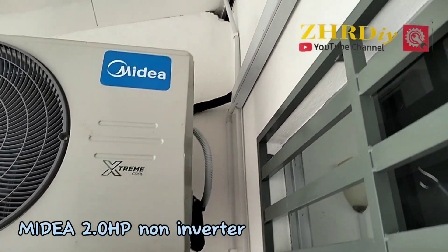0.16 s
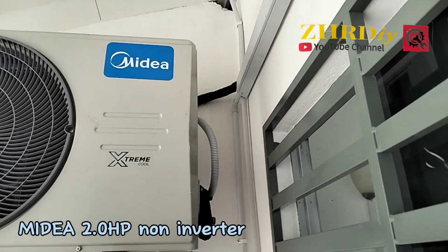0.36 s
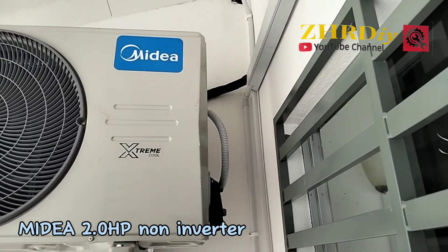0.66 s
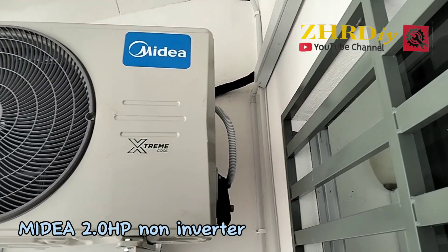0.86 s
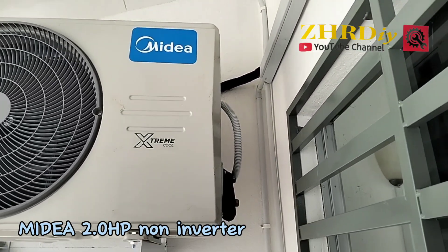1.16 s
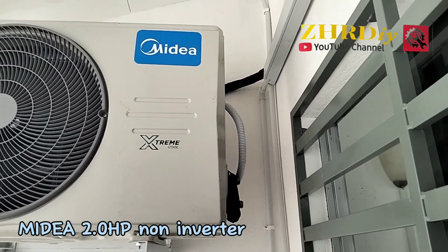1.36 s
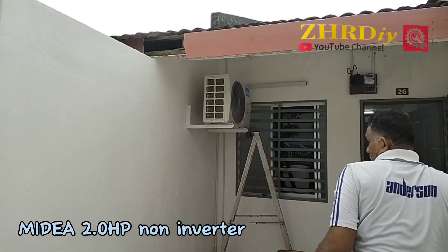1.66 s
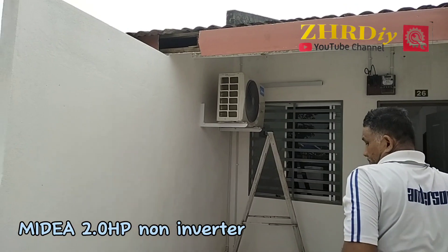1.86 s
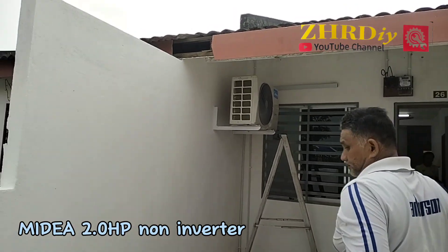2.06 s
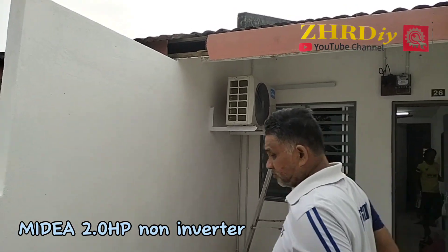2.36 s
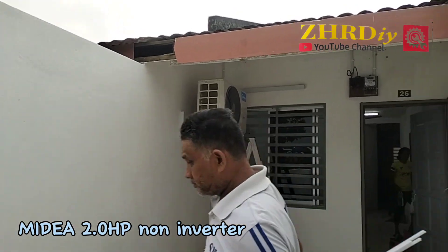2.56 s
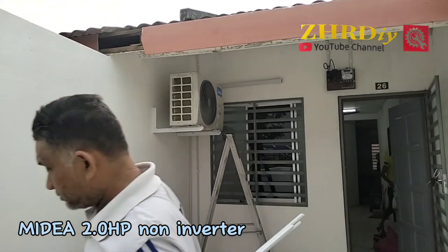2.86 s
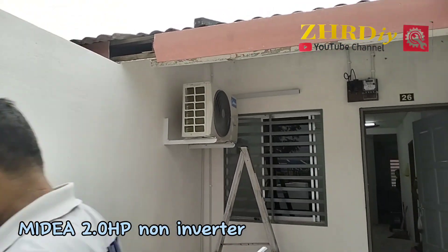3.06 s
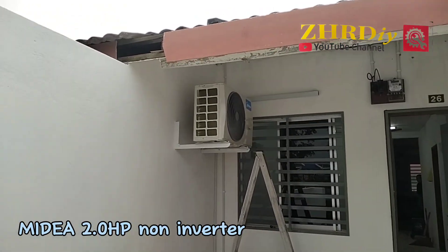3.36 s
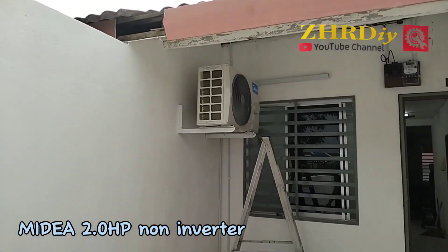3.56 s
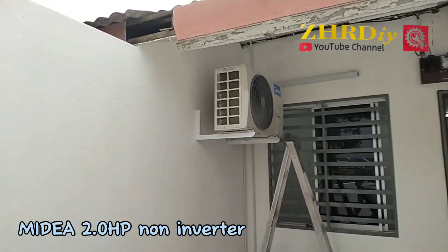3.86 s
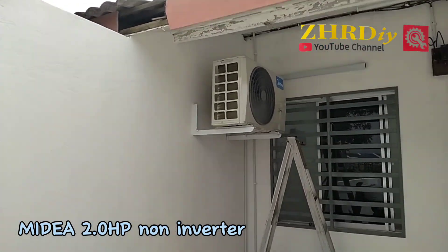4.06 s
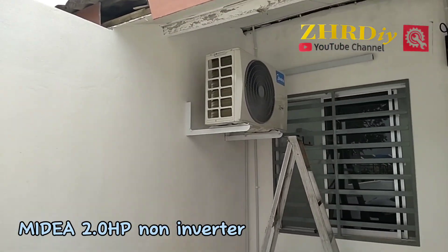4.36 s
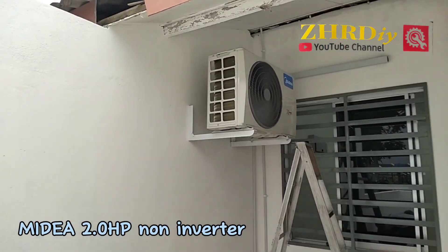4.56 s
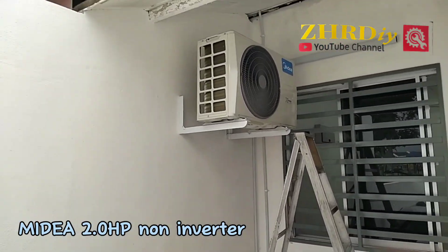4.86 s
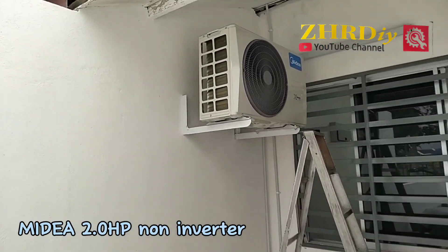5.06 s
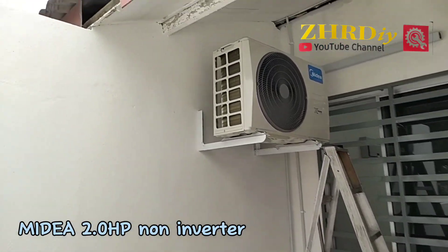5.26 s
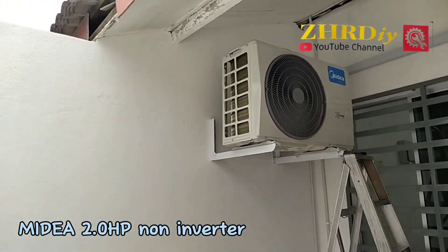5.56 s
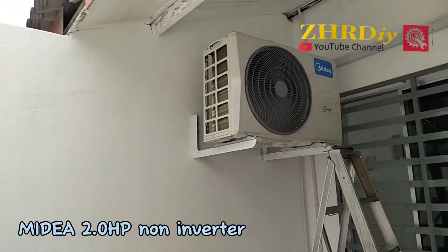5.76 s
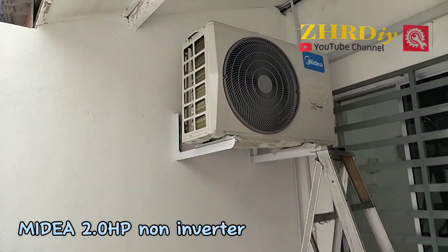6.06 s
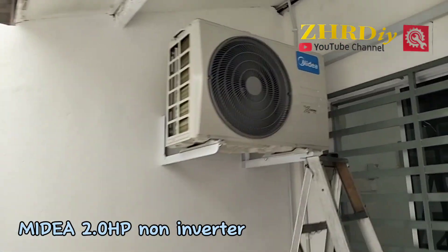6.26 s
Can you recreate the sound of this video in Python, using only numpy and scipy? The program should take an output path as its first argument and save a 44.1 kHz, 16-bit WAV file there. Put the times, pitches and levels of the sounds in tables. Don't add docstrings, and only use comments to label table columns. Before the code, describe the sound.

Close to an outdoor air conditioner, a low motor hum and airy fan whoosh run steadily while sandals scuff away over gritty tile. The view abruptly shifts farther off and the hum thins. Footsteps return, a light metal object clacks, then clanks much harder with a brief scrape. Soft scuffs finish beside the unit. Handheld microphone, hard-walled porch, slight wind rumble.

```python
import sys
import numpy as np
from scipy import signal
from scipy.io import wavfile
from scipy.ndimage import uniform_filter1d

SR = 44100
rng = np.random.default_rng(int(sys.argv[2]) if len(sys.argv) > 2 else 0)


def put_to_file(sound):
    columns = np.atleast_2d(sound).T
    safe = np.clip(columns, -1, 1)
    whole_steps = np.round(safe * 32767)
    wavfile.write(sys.argv[1], SR, whole_steps.astype(np.int16))


def invert_db(x):
    u = np.asarray(x, float) / 20
    return 10 ** u


N = 283111
CUT_S = 1.36

# time in seconds, distance in m.
DISTANCE = [
    (0, 1.06),
    (1.36, 1.21),
    (1.375, 7.6),
    (1.8, 10.2),
    (2.9, 6.5),
    (3.9, 5.2),
    (5, 3.17),
    (6.42, 1.82),
]

# time in
# seconds, mains hum in dB, # compressor swell in dB, blade swell in dB, panel swell in dB.
TONE_SWELLS = [(0, -44, 1.5, -1, 8), (.55, -38.5, -2, 0.5, 8), (.8, -35, 2.5, -3, 2),
               (1.05, -41, 3.5, 1.5, 11.5), (1.34, -37, 2, -1, 5.5), (1.38, -46, 8.5, 0, 9),
               (1.85, -40.5, 1, -10, -2), (2.2, -42.5, 8, -3, -1), (2.5, -40, 0, -0.5, 5),
               (2.85, -41.5, -2, -12, -4), (3.15, -42, -3, -1, 4), (3.75, -40.5, 6, 0.5, 4),
               (3.95, -41.5, 6.5, 2, 6), (4.3, -48, 9, 2, 1.5), (4.8, -55, 5, 0, 8.5),
               (5.25, -52, 6, 0, -1.5), (5.9, -67, 1.5, 0, 0), (6.42, -45.5, -5.5, -2.5, -2)]
MAINS_HZ, COMPRESSOR_HZ, BLADES_HZ = 100.2, 131.15, 193.3
COMPRESSOR_DB, BLADES_DB, PANELS_DB, WHOOSH_DB = -32, -30.5, 9.5, -39.5
PANELS_REACH, WHOOSH_REACH, GRILLE_REACH, SHAFT_REACH = 0.81, 0.32, 0.56, 0.25
# frequency in Hz, bandwidth in Hz, level in dB.
PANEL_MODES = [(263.4, 12.5, -55.5), (1041, 29, -55.5)]
# frequency in Hz, bandwidth in Hz, level in dB at one metre.
CAVITY_MODES = [(247, 28, -47.5), (334, 42, -47), (499, 83, -46)]
SHAFT_HZ = 48.36
# multiple of the shaft rate, level in dB at one metre.
LOW_ORDERS = [(3, -45), (5, -53), (6, -56), (9, -57), (10, -58), (11, -61), (18, -62)]
# time in seconds, then levels of the 19th, 20th and 21st order in dB.
SLOT_WHINE = [(0, -56, -51, -62), (.3, -53, -49, -64), (1.3, -53, -59, -65), (1.45, -70, -65, -52),
              (2.3, -73, -74, -56.5), (2.7, -70, -70, -58), (3.1, -57, -55, -53), (3.6, -57, -52, -58),
              (4.0, -59, -59, -56), (4.5, -66, -50, -64), (5.0, -55, -57, -60), (5.4, -59, -75, -53),
              (5.9, -51, -49, -54), (6.42, -58, -58, -62)]
# frequency in Hz, density in dB per Hz.
WHOOSH_SPECTRUM = [(120, -17), (200, 0), (243, -7), (330, -8.5), (440, -12.5), (632, -10.5), (678, -10.5),
                   (768, -9.5), (907, -11), (1030, -11), (1160, -11.5), (1760, -16.5), (2300, -24.5),
                   (2900, -29), (4290, -27), (5500, -49), (7150, -70), (12100, -120)]

# time in seconds, peak in dB, main mode in Hz, 4 kHz modes in dB, t60 in seconds.
METAL_KNOCKS = [(3.8419, -9.5, 1333, 7.5, 0.033), (3.8462, -12, 1350, -12, 0.023),
                (3.928, -22, 1200, -10, .02), (3.964, -19, 1220, -8, .015), (3.878, -18, 1280, -15, 0.019),
                (3.9228, -14, 1480, -10, 0.011), (3.975, -8.5, 1580, -1.5, 0.0074),
                (4.647, -15, 1120, -15, 0.014), (4.6604, -14, 1200, 2, 0.017),
                (4.7031, -12, 1170, -8, 0.019), (4.7205, -17, 1510, -10, .012),
                (4.747, -13.5, 1230, -10, .02), (4.6791, 6, 1380, -3, .009), (4.6965, -1, 1165, -8, 0.018),
                (4.7128, -6, 1280, -5, .013), (4.733, -16, 1200, -12, .02), (4.9212, 1, 1220, -18, 0.007),
                (4.965, -21, 1410, 3, 0.012), (5.172, -30, 1300, -12, 0.07), (5.183, -26, 1290, -8, .04),
                (5.264, -17.5, 1330, -15, 0.017), (5.323, -28, 1100, 2, 0.057), (6.118, -25, 1240, 7, 0.02),
                (6.183, -23, 1060, -1, 0.023)]
STRIKE_S = .0017
# frequency in Hz, level in dB, t60 in seconds.
LOW_OVERTONES = [(1650, -3, .01), (2100, 0, .012), (2420, -4, .012)]
# frequency in Hz, level in dB, t60 in seconds.
MID_OVERTONES = [(3900, -2, .01), (4450, 0, .01), (5000, -4, .008)]
# frequency in Hz, level in dB, t60 in seconds.
EDGE_MODES = [(6800, 3, 0.0045), (8000, 1, 0.0061), (8600, 0, 0.0069), (11600, -3, 0.0044),
              (14800, -4, .004)]
# time in seconds, peak in dB.
EDGE_HITS = [(3.976, -22), (4.679, -1), (4.6802, -11), (4.713, -20), (3.924, -32), (3.929, -32),
             (5.19, -40), (5.266, -38), (4.697, -26), (6.1195, -40), (.1706, -26), (2.5617, -35)]
# time in seconds, peak in dB, frequency in Hz.
GRAIN_SNAPS = [
    (0.0994, -48, 5420),
    (1.8354, -38, 5010),
    (1.9232, -32, 11400),
    (2.6035, -44, 7000),
    (3.3684, -48, 5580),
    (3.7738, -41, 5290),
    (5.4994, -51, 5510),
    (5.9694, -37, 5450),
]

# start in seconds, rise in seconds, slide in seconds,
# hiss in dB, weight on the sole in dB.
SANDAL_SCUFFS = [(.03, 0.09, .005, -58, 10.5), (.16, 0.0087, .005, -56.5, 9), (.2, 0.07, .1, -46.5, 5),
                 (.68, 0.02, .02, -54.5, 6), (.72, 0.036, 0.076, -48.5, -2), (.76, 0.069, 0.1, -43.5, 5.5),
                 (.9, .05, .1, -53.5, 6), (1.18, 0.022, .03, -62, 5), (1.349, 0.012, 0.027, -50.5, 4.5),
                 (1.36, 0.059, 0.13, -48, 5), (1.48, 0.097, 0.12, -51, 7.5), (1.6, 0.078, 0.014, -50, 9),
                 (1.82, 0.036, 0.051, -65, 10.5), (1.912, 0.0071, 0.037, -52.5, -1),
                 (1.945, .02, 0.095, -53.5, 4.5), (2.02, 0.052, 0.031, -53, 9),
                 (2.25, .04, 0.061, -55, -2), (2.558, 0.0091, .02, -65, 9), (2.593, 0.013, 0.23, -51.5, 4),
                 (2.91, 0.085, 0.033, -53.5, 1.5), (3.04, .02, 0.026, -61.5, 5),
                 (3.11, 0.05, .01, -54.5, -1), (3.23, 0.026, 0.053, -67.5, 15),
                 (3.35, 0.023, .05, -58, 3), (3.389, 0.063, 0.028, -52, 2),
                      (3.54, 0.018, 0.17, -55, -0.5), (3.762, 0.013, 0.046, -53, 6.5),
                      (3.78, 0.071, 0.028, -45, 5.5), (3.968, .016, 0.0091, -43.5, 8),
                      (4.065, 0.05, 0.12, -51, 7), (4.33, 0.025, 0.15, -65.5, 7.5), (4.5, .03, .05, -70, 8),
                      (4.6, .035, .015, -49.5, 0), (4.99, .02, 0.043, -55, 1),
                      (5.06, 0.019, 0.028, -56, 12), (5.41, 0.013, 0.094, -61.5, 9.5),
                      (5.25, 0.019, .02, -62.5, 19), (5.57, 0.07, 0.066, -47.5, 1.5),
                      (5.62, 0.039, 0.14, -48.5, 5), (5.8, 0.023, 0.1, -58, 8.5),
                      (5.9, 0.071, 0.028, -53, 5), (6.0, 0.053, 0.11, -61, 14),
                      (6.112, .012, .01, -53.5, 13), (6.18, 0.013, 0.045, -56, 11.5),
                      (6.2, 0.05, 0.16, -51.5, -7)]
# start in seconds, rise in seconds, slide in seconds, drag in dB,
# brightness in dB.
METAL_SCRAPES = [(1.36, 0.035, 0.1, -39.5, -17), (1.6, 0.065, 0.033, -38.5, -19),
                 (3.845, 0.0061, .003, -31, -4), (3.86, 0.012, 0.083, -42, -7),
                 (3.91, 0.035, .01, -30, -9.5), (4.642, 0.013, .01, -33, -13),
                 (4.659, 0.0032, 0.008, -28, -4), (4.666, 0.014, 0.022, -18, -6.5),
                 (4.686, 0.0076, 0.02, -16, -7.5), (4.78, 0.058, 0.14, -39, -11),
                 (4.881, 0.0054, 0.062, -38.5, 5.5), (4.91, 0.027, 0.04, -26.5, -7),
                 (4.98, 0.015, 0.065, -39, -9), (5.1, 0.014, 0.019, -38, -9.5),
                 (5.16, .035, 0.028, -34.5, -11), (5.29, 0.024, 0.043, -40, -6.5)]
# start in seconds, rise in seconds, slide in seconds, level in dB, weight in dB.
SLAT_RATTLES = [
    (0.9, 0.18, .1, -42.5, 0),
    (1.1, 0.12, .14, -43.5, 0),
]
# start in seconds, rise in seconds, slide in seconds, level in dB, weight in dB.
SAND_CRUNCHES = [
    (.69, 0.043, .1, -48, 0),
    (.8, .05, 0.11, -41, 0),
    (1.35, .03, .2, -50, 0),
    (1.55, 0.12, 0.035, -47, 0),
    (3.9, 0.025, .04, -53, 0),
    (4.08, 0.022, .1, -49.5, 0),
]
ONSET_DB, SAG_DB, LIFT_DB_PER_S = -15.5, -3, 216
# dB per dB of weight, dB above hiss; light soles whisper higher
SOLE_RASP, SOLE_DRAG, SOLE_SHEEN = (0.95, -4), (0.76, 1.84), (-.5, -4.5)
METAL_RASP_DB, METAL_DRAG_DB, METAL_SHELF_DB, LEG_DB = -14, -4, -10, -7
METAL_HISS_DB, METAL_HISS_GROWTH = -13.5, 1.27
GRILLE_GRIT_DB, GRILLE_RASP_DB, GRILLE_DRAG_DB = -55, -71, -43
# frequency in Hz, density in dB per Hz.
HISS_SPECTRUM = [(3200, -26), (5000, 0), (6200, -1.5), (7000, -0.5), (7600, -4), (8500, -2), (9200, -4),
                 (10800, -2.5), (11300, 0), (12200, 0), (13200, -8), (14600, -7), (15500, -11.5)]
# frequency in Hz, density in dB per Hz.
GRIT_SPECTRUM = [(2500, -20), (3000, -3), (3600, 1), (4250, 5), (4700, -2), (5300, -8), (6200, -7),
                 (7200, -22.5)]
# frequency in Hz, density in dB per Hz.
RASP_SPECTRUM = [(1450, -15), (1750, 1), (2100, -3.5), (2400, -3), (2650, -7), (3000, -4), (3500, -46)]
# frequency in Hz, density in dB per Hz.
DRAG_SPECTRUM = [(650, -10), (900, 0), (1100, 8), (1300, 9), (1600, 5), (2000, -28)]
# frequency in Hz, density in dB per Hz.
SHEEN_SPECTRUM = [(10500, -30), (12500, -6), (13300, 5), (14500, -4), (15600, -4)]
# frequency in Hz, density in dB per Hz.
SAND_SPECTRUM = [(4300, -21), (5000, 1), (5800, 0), (7000, -5.5), (8000, -18)]
# frequency in Hz, density in dB per Hz.
SLAT_SPECTRUM = [(900, -22), (1400, 3), (2000, 4), (2300, 5), (2500, -5), (2900, -29)]
# frequency in Hz, density in dB per Hz.
METAL_HISS_SPECTRUM = [(3200, -30), (5000, -13), (6500, 3), (8500, 0), (11500, 0), (13000, -1), (14800, -6),
                       (15600, -12)]
# frequency in Hz, level in dB, t60 in seconds.
LEG_MODES = [(1104, -9.5, 0.076), (1237, -4.5, 0.2), (1377, -4, 0.081), (1500, 0.5, 0.098),
             (1553, 0, 0.066), (2143, -8, 0.081), (2340, -8, 0.066), (2780, -13, 0.13), (3450, -15, 0.095),
             (3610, -6, 0.089), (3860, -23, 0.11), (4285, -14, 0.079), (4460, -21, 0.092)]

# time in seconds, peak in
# dB, start pitch in Hz, end pitch in Hz, length in seconds.
SOFT_THUDS = [(1.344, -26.5, 110, 55, 0.035), (1.4, -26, 100, 44, 0.022), (1.438, -24, 74, 40, 0.018),
              (2.06, -38, 180, 180, 0.087), (2.13, -32.5, 180, 164, 0.11), (4.702, -26.5, 595, 380, 0.0096),
              (2.21, -44.5, 325, 310, .11), (5.196, -30, 1350, 1550, 0.015), (4.7, -31, 1490, 1320, 0.013),
              (3.9225, -24, 1780, 1600, 0.0045), (3.68, -27, 110, 86, 0.044), (3.741, -24.5, 88, 70, 0.055),
              (3.79, -30.5, 48, 35, 0.042), (3.669, -39.5, 262, 262, 0.16), (4.7, -28.5, 370, 380, 0.027),
              (4.704, -36, 450, 450, 0.032), (3.955, -39, 640, 690, 0.028), (4.0, -37, 800, 750, 0.027),
              (1.205, -38.5, 1270, 1240, .08), (1.41, -39, 1290, 1330, 0.055)]
# frequency in Hz, t60 in seconds.
PORCH_T60 = [(500, 0.61), (1200, 0.47), (4000, 0.54), (12000, 0.48)]
# time in seconds, rumble in dB.
BREEZE_LEVEL = [(0, -43.5), (1.0, -40), (1.19, -46), (1.37, -44), (1.64, -45.5), (2.18, -44.5), (2.82, -56),
                (3.07, -46), (3.86, -51), (5.07, -52.5), (5.49, -48.5), (6.42, -53.5)]
# frequency in Hz, density in dB per Hz.
RUMBLE_SPECTRUM = [(10, -2), (20, 15), (30, 0), (45, 10.5), (80, 11), (115, 9), (160, 2.5), (220, 6),
                   (300, -41)]
# frequency in Hz, density in dB per Hz.
YARD_SPECTRUM = [(3060, -28), (5200, -8), (6130, 9), (9080, -3), (9950, 8), (10800, -14), (11500, 5),
                 (13500, -15), (15500, -15)]
YARD_DB = -70.5


def motor():
    mains_db, compressor_swell_db, blade_swell_db, panel_swell_db = curves(TONE_SWELLS)
    loss_db = spreading_db()
    out = tone(MAINS_HZ, mains_db, 0.2, 0.23, 7.6)
    out += tone(COMPRESSOR_HZ, COMPRESSOR_DB + loss_db + compressor_swell_db, 0.059, 0.25, 11)
    out += tone(BLADES_HZ, BLADES_DB + loss_db + blade_swell_db, 0.31, 1.36, 13)
    close_db = np.where(np.arange(N) < CUT_S * SR, -8, 0)
    panels_db = PANELS_DB + PANELS_REACH * loss_db + panel_swell_db + close_db
    for hz, width_hz, db in PANEL_MODES:
        out += invert_db(db + panels_db) * resonance(hz, width_hz)
    return out


def shaft():
    turns = np.cumsum(SHAFT_HZ + .02 * drift(3)) / SR
    loss_db = SHAFT_REACH * spreading_db()
    orders = [(k, db + loss_db + 2 * drift(6)) for k, db in LOW_ORDERS]
    orders += [(19 + k, db + 1.5 * drift(8)) for k, db in enumerate(curves(SLOT_WHINE))]
    out = np.zeros(N)
    for k, db in orders:
        out += np.sqrt(2) * invert_db(db) * np.sin(2 * np.pi * (k * turns + rng.random()))
    return out


def cavity():
    return invert_db(spreading_db()) * sum(invert_db(db) * resonance(hz, width_hz) for hz, width_hz, db in CAVITY_MODES)


def fan():
    whoosh_db = WHOOSH_DB + WHOOSH_REACH * spreading_db()
    return invert_db(whoosh_db + 2.0) * noise(WHOOSH_SPECTRUM, 0.095, 0.47, size=2048)


def knocks():
    out = np.zeros(N)
    t = np.arange(SR // 8) / SR
    strike = np.sin(np.pi / 2 * np.minimum(t / STRIKE_S, 1)) ** 2
    for s, db, hz, mid_db, t60 in METAL_KNOCKS:
        low_detune, mid_detune = rng.uniform(.96, 1.04, 2)
        blow = ring([(hz, 0, max(t60, .004))], t)
        blow += invert_db(-11) * ring(LOW_OVERTONES, t, low_detune)
        blow += invert_db(mid_db - 9.0) * ring(MID_OVERTONES, t, mid_detune)
        add(out, s, invert_db(db) * blow * strike)
    for s, db in EDGE_HITS:
        add(out, s, invert_db(db - 11.5) * ring(EDGE_MODES, t) * np.minimum(t / .0006, 1))
    for s, db, hz in GRAIN_SNAPS:
        add(out, s, ring([(hz, db, .003)], t))
    return out


def scuffs():
    soles = SANDAL_SCUFFS
    grille_db = GRILLE_REACH * spreading_db()
    grit = strokes(soles, 0.88) + strokes(METAL_SCRAPES, 1)
    grit += invert_db(GRILLE_GRIT_DB + grille_db) ** 2
    rasp = strokes(soles, *SOLE_RASP) + strokes(METAL_SCRAPES, 0, METAL_RASP_DB)
    rasp += invert_db(GRILLE_RASP_DB + grille_db) ** 2
    drag = strokes(soles, *SOLE_DRAG) + strokes(METAL_SCRAPES, 0, METAL_DRAG_DB)
    drag += invert_db(GRILLE_DRAG_DB + grille_db) ** 2
    metal_hiss = strokes(METAL_SCRAPES, 0, METAL_HISS_DB, METAL_HISS_GROWTH)
    slat = strokes(SLAT_RATTLES) + strokes(METAL_SCRAPES, 0, METAL_SHELF_DB)
    out = np.sqrt(grit) * invert_db(-0.28) * noise(GRIT_SPECTRUM, 1.6, 0.53)
    out += np.sqrt(rasp) * invert_db(1.5) * noise(RASP_SPECTRUM, 0.29, 0.42)
    out += np.sqrt(drag) * invert_db(-2.0) * noise(DRAG_SPECTRUM, 2.6, 0.52)
    out += np.sqrt(strokes(soles)) * invert_db(0.7) * noise(HISS_SPECTRUM, 3.0, 0.74, size=1024)
    out += np.sqrt(strokes(soles, *SOLE_SHEEN)) * noise(SHEEN_SPECTRUM, 1.5, .9)
    out += np.sqrt(metal_hiss) * noise(METAL_HISS_SPECTRUM, 1.4, 0.72)
    out += np.sqrt(slat) * noise(SLAT_SPECTRUM, 1.2, 1.0)
    return out + np.sqrt(strokes(SAND_CRUNCHES)) * noise(SAND_SPECTRUM, 4.1, .9)


def leg():
    jolt_db = 3.5 * rng.exponential(1, N // 40 + 1).repeat(40)[:N]
    jolts = evened(rng.standard_normal(N) * invert_db(jolt_db))
    force = np.sqrt(strokes(METAL_SCRAPES, 0, LEG_DB)) * jolts
    body = ring(LEG_MODES, np.arange(SR // 6) / SR, 0.94)
    return signal.oaconvolve(force, body / np.sqrt(np.sum(body ** 2)))[:N]


def thuds():
    out = np.zeros(N)
    for s, db, start_hz, end_hz, length in SOFT_THUDS:
        t = np.arange(0, length, 1 / SR)
        turns = np.cumsum(np.linspace(start_hz, end_hz, len(t))) / SR
        add(out, s, invert_db(db) * np.sin(np.pi * t / length) * np.sin(2 * np.pi * turns))
    return out


def porch(x):
    taps = rng.choice([-1., 1.], SR // 2) * (rng.random(SR // 2) < .06)
    taps[:150] = 0
    hz, t, z = signal.stft(taps, SR, nperseg=256)
    decay = invert_db(-60 * t / read(PORCH_T60, hz)[:, None])
    tail = signal.istft(z * decay, SR, nperseg=256)[1]
    return signal.fftconvolve(x, tail / np.linalg.norm(tail))[:N]


def breeze():
    return invert_db(curves(BREEZE_LEVEL)[0] + 6.0) * noise(RUMBLE_SPECTRUM, 1.0, 1.0, size=4096)


def yard():
    return invert_db(YARD_DB) * noise(YARD_SPECTRUM, 1.7, .8)


def spreading_db():
    return -20 * np.log10(np.maximum(curves(DISTANCE)[0], .1))


def tone(hz, db, waver_hz, waver_db, rate_hz):
    turns = np.cumsum(hz + waver_hz * drift(rate_hz)) / SR + rng.random()
    return np.sqrt(2) * invert_db(db + waver_db * drift(rate_hz)) * np.sin(2 * np.pi * turns)


def resonance(hz, width_hz):
    t = np.arange(SR // 2) / SR
    response = np.exp(-np.pi * width_hz * t) * np.sin(2 * np.pi * hz * t)
    return evened(signal.oaconvolve(rng.standard_normal(N), response)[:N])


def ring(modes, t, shift=0.96):
    return sum(invert_db(db - 60 * t / t60) * np.sin(2 * np.pi * hz * shift * t) for hz, db, t60 in modes)


def strokes(rows, slope=0, offset_db=0, growth=1):
    power = np.zeros(N)
    for s, rise, slide, db, weight_db in rows:
        rise, slide = max(rise, .002), max(slide, .001)
        t = np.arange(0, rise + slide + .3, 1 / SR)
        shape_db = np.interp(t, [0, rise, rise + slide], [ONSET_DB, 0, SAG_DB])
        shape_db -= LIFT_DB_PER_S * np.maximum(t - rise - slide, 0)
        add(power, s, invert_db(shape_db + growth * db + slope * weight_db + offset_db) ** 2)
    return power


def noise(spectrum, patchy_db, flicker_db, size=512):
    frames, hz = 4 * N // size + 5, np.fft.rfftfreq(size, 1 / SR)
    a, b, patches = rng.standard_normal((frames, len(hz), 3)).T.astype(np.float32, order="C")
    patches = uniform_filter1d(patches, size=7, axis=0)
    patches = evened(uniform_filter1d(patches, size=14, axis=1))
    flicker = evened(uniform_filter1d(rng.standard_normal(frames), size=4))
    level_db = read(spectrum, hz)[:, None] + patchy_db * patches + flicker_db * flicker
    z = (a + 1j * b) * invert_db(level_db)
    return evened(signal.istft(z, nperseg=size, noverlap=size - size // 4)[1][:N])


def drift(rate_hz):
    steps = rng.standard_normal(400)
    return np.interp(np.arange(N) / SR * rate_hz, np.arange(len(steps)), steps) * np.sqrt(1.5)


def evened(x):
    return x / np.sqrt(np.mean(x ** 2) + 1e-20)


def read(points, hz):
    f, value = np.transpose(points)
    return np.interp(np.log(hz + 1), np.log(f + 1), value)


def curves(rows):
    s, *columns = np.transpose(rows)
    return [np.interp(np.arange(N) / SR, s, c) for c in columns]


def add(mix, s, sound):
    part = mix[round(s * SR):][:len(sound)]
    part += sound[:len(part)]


def scene():
    blows = knocks()
    machine = motor() + shaft() + cavity() + fan()
    contacts = blows + scuffs() + leg() + thuds()
    surroundings = invert_db(-9.5) * porch(blows) + breeze() + yard()
    return (machine + contacts + surroundings)[None]


def top_cut(x):
    return signal.sosfilt(signal.butter(12, 15830, fs=SR, output="sos"), x)


def record(dry):
    lowpass = signal.firwin(511, 15760, window=("kaiser", 9), fs=SR)
    limited = signal.oaconvolve(dry, lowpass[None], "same")
    return top_cut(limited)


dry = scene()
out = record(dry)
put_to_file(out)
```